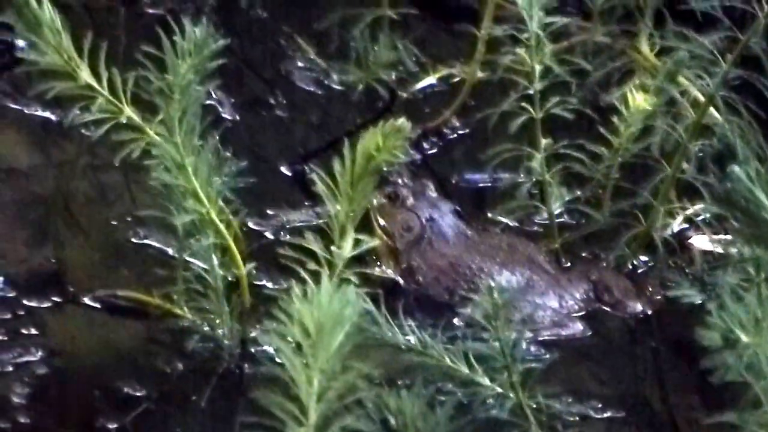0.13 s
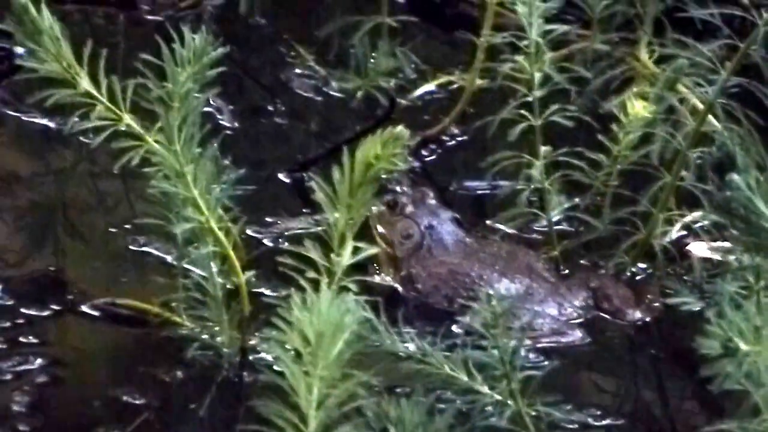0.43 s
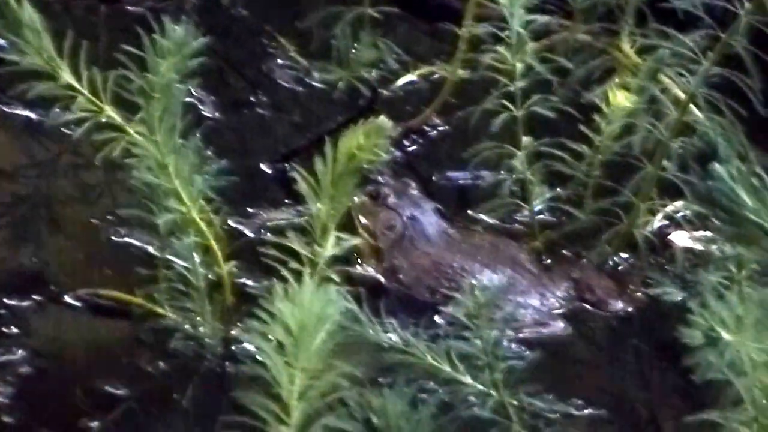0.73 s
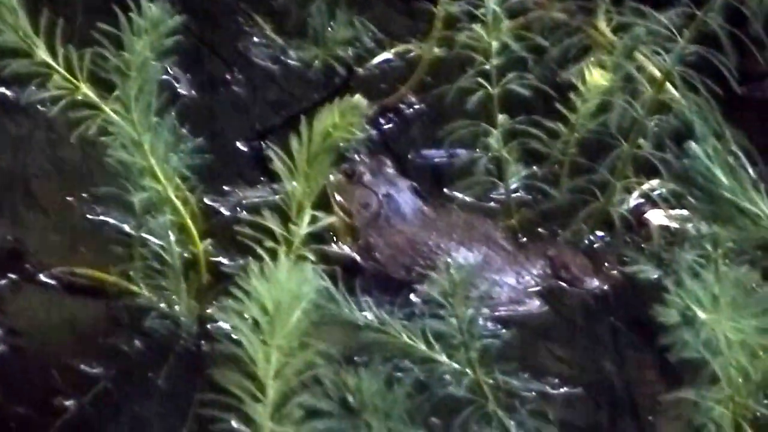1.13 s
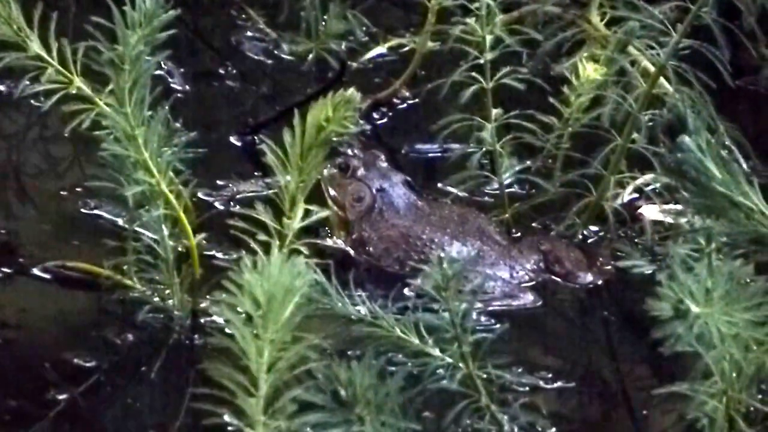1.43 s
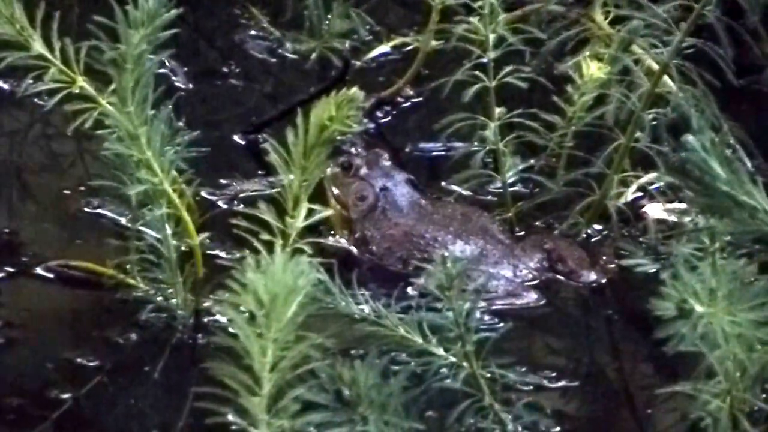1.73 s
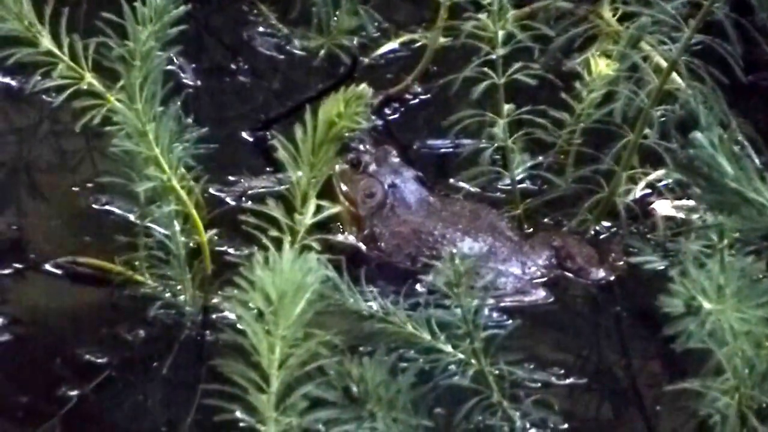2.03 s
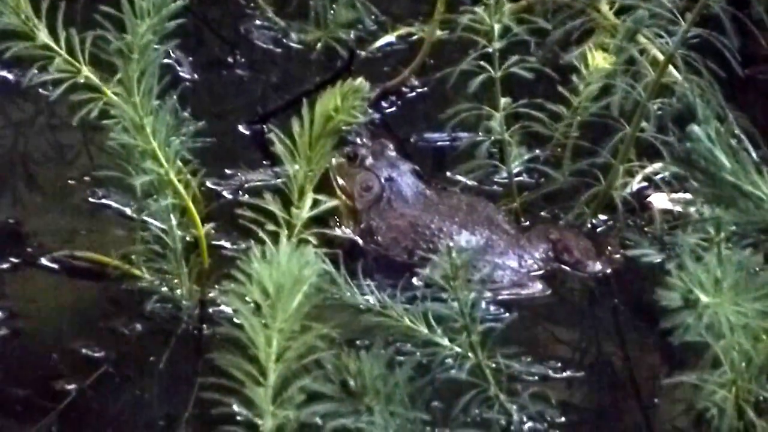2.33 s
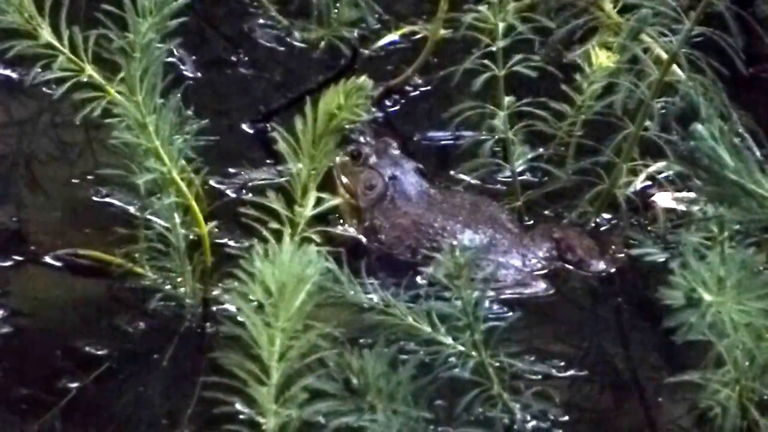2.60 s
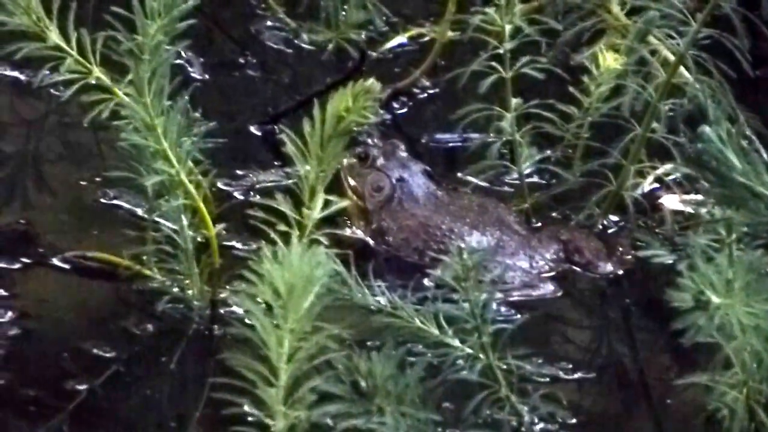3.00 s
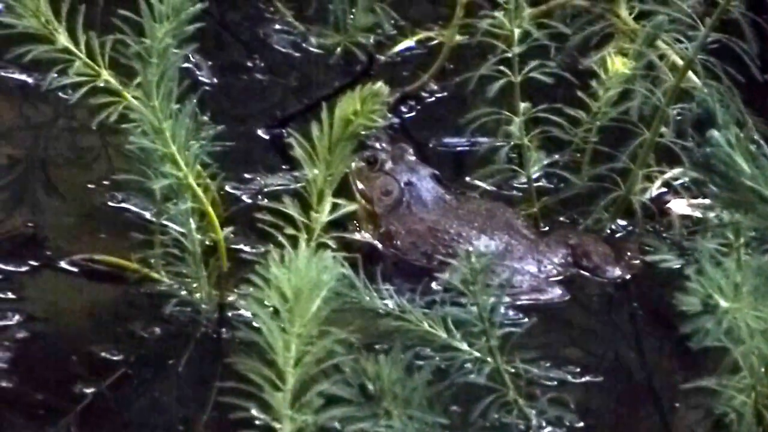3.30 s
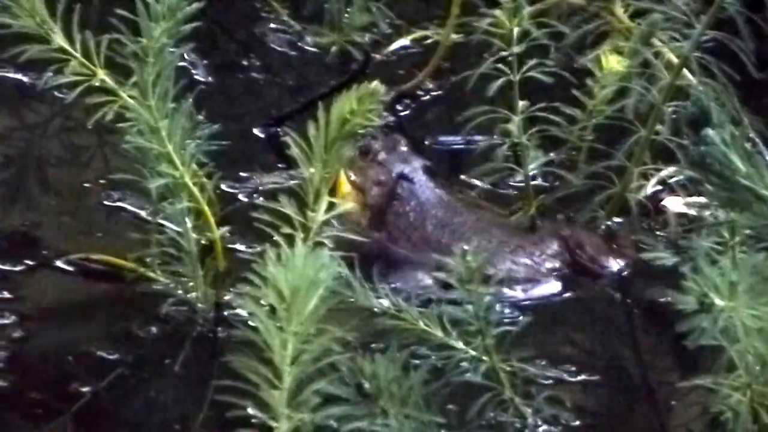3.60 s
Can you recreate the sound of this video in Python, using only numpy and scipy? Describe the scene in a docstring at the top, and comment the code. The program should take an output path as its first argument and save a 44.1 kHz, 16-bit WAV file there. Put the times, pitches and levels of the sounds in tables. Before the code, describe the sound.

Two short, deep bullfrog bellows amid dense katydid buzz and small frogs' high peeps and trills.

```python
"""A pond at night. Throughout, filtered noise gives the night air, a murmur of far bullfrogs and a dense
katydid chorus; a cricket pulses in short tones, and a crowd of small frogs peeps in bell-shaped notes.
From the start, near small frogs add single chirps and pulsed, gliding trills. Two near bullfrogs, harmonic
pulses and rasp through throat resonances, bellow once each: one early, one in the last moments."""
import sys
import numpy as np
from scipy import signal
from scipy.fft import rfft, irfft
from scipy.io import wavfile
from scipy.ndimage import uniform_filter1d, map_coordinates

SR = 44100
rng = np.random.default_rng(int(sys.argv[2]) if len(sys.argv) > 2 else 0)


def wav_out(sig):
    """Save sig, one row per channel (or a flat mono array), as 16-bit PCM at SR to the path in sys.argv[1]."""
    wavfile.write(sys.argv[1], SR, np.round(np.clip(np.atleast_2d(sig).T, -1, 1) * 32767).astype(np.int16))


def gain_from_db(level_db):
    """Turn a decibel level (scalar or array-like) into a linear amplitude factor."""
    decades = np.asarray(level_db, float) / 20
    return 10 ** decades


N = 165375  # samples
T = np.arange(N) / SR  # time in s


def unit(x):
    """Normalization: x scaled to a root-mean-square value of 1."""
    return x / np.sqrt(np.mean(x ** 2) + 1e-20)


def along(points, hz):
    """Interpolation of (Hz, value) points on a logarithmic frequency axis."""
    f, v = np.transpose(points)
    return np.interp(np.log(hz + 1), np.log(f + 1), v)


def wobble(rate):
    """Slow random modulation: a smooth curve through random knots, rate of them a second."""
    knots = rng.standard_normal(int(N * rate / SR) + 4)
    return map_coordinates(knots, [T * rate])


def place(x, pan_db, lag_s):
    """Stereo localization by level (left over right) and time (left after right) differences."""
    hz = np.fft.rfftfreq(N, 1 / SR)
    side = np.array([[.5], [-.5]])
    delay = np.exp(-2j * np.pi * hz * side * lag_s)
    return irfft(rfft(x) * gain_from_db(side * pan_db) * delay, N)


def through(x, points):
    """Minimum-phase filtering: a causal filter with the gain of (Hz, dB) points."""
    gain = gain_from_db(along(points, np.fft.rfftfreq(8192, 1 / SR)))
    cepstrum = irfft(np.log(gain))
    # folding the cepstrum onto positive times makes the response causal
    cepstrum[1:4096] *= 2
    cepstrum[4097:] = 0
    response = irfft(np.exp(rfft(cepstrum)))
    return signal.fftconvolve(x, response)[:N]


def bank(x, t60, wet_db):
    """Diffuse reflection: x plus a short echo of reeds and bank, which scatter only the shorter waves."""
    t = np.arange(SR // 4) / SR
    tail = rng.standard_normal(len(t)) * gain_from_db(-60 * t / t60) * (t > .003)
    highpass = signal.butter(2, 600, "high", fs=SR, output="sos")
    tail = signal.sosfilt(highpass, tail)
    return x + gain_from_db(wet_db) * signal.fftconvolve(x, tail / np.linalg.norm(tail))[:N]


# Likeness of the two channels of diffuse sound: frequency [Hz], correlation [-1 to 1]
CHANNEL_LIKENESS = [(60, 0.93), (120, 0.96), (240, 1), (480, 0.86), (950, 0.53), (1890, 0.39), (3770, 0.26),
                    (7520, 0.29), (15000, -0.28)]
# Balance of the two channels of diffuse sound: frequency [Hz], left_over_right [dB]
CHANNEL_BALANCE = [(30, -4), (180, -2), (550, -1.5), (2400, 0), (4300, -2), (5500, 1), (9000, 0),
                   (15000, 2.5)]


def rush(spectrum, patchy_db):
    """Diffuse field: partly correlated stereo noise of rms 1, with time-frequency patches of random gain."""
    z = signal.stft(rng.standard_normal((2, N)), nperseg=512)[2]
    field = rng.standard_normal(z.shape[1:])
    field = uniform_filter1d(field, size=4, axis=0)
    field = uniform_filter1d(field, size=12, axis=1)
    noise = signal.istft(z * gain_from_db(patchy_db * unit(field)), nperseg=512)[1][:, :N]
    hz = np.fft.rfftfreq(N, 1 / SR)
    # the shares of mid and side set the correlation of left and right
    angle = np.arccos(np.clip(along(CHANNEL_LIKENESS, hz), -1, 1)) / 2
    mid, side = rfft(noise) * [np.cos(angle), np.sin(angle)]
    balance = gain_from_db(along(CHANNEL_BALANCE, hz) / 2)
    left, right = (mid + side) * balance, (mid - side) / balance
    return unit(irfft(gain_from_db(along(spectrum, hz)) * [left, right], N))


# Night air, the farthest small frogs and a faint far cricket, as a spectral shape:
# frequency [Hz], relative_density [dB per Hz]
AIR_SPECTRUM = [(18, -50), (30, -41), (49, -21.5), (102, -24.5), (200, -21.5), (443, -36.5), (690, -35),
                (1680, -39.5), (1950, -28), (2120, -18), (2330, -28), (2550, -41), (2980, -30.5),
                (3080, -35.5), (3180, -35.5), (3580, -40), (3900, -17.5), (4250, -13), (4650, -19.5),
                (5200, -36), (6000, -60)]


def night_air():
    """Spectral shaping: steady diffuse noise whose bands stand for air and the farthest callers."""
    return gain_from_db(-36) * rush(AIR_SPECTRUM, patchy_db=1.1)


# Far bullfrogs merged, as a spectral shape: frequency [Hz], relative_density [dB per Hz]
MURMUR_SPECTRUM = [(90, -32), (140, -3.5), (195, 3), (224, 1.5), (269, -19), (307, -2), (350, -1),
                   (410, -15), (480, -25.5)]
# Mean course of their murmur, before its random swells: time [s], level [dB]
MURMUR_COURSE = [(0, -48.5), (1.3, -45.5), (2.5, -48), (3, -42.5), (3.4, -42)]


def far_bullfrogs():
    """Incoherent summation: far voices merge into low noise that swells now and then."""
    level_db = np.interp(T, *np.transpose(MURMUR_COURSE)) + 3.7 * wobble(2.35)
    return gain_from_db(level_db) * rush(MURMUR_SPECTRUM, patchy_db=1.0)


# Katydid chorus as a spectral shape: frequency [Hz], relative_density [dB per Hz]
KATYDID_SPECTRUM = [(2880, -60.5), (4900, -22.5), (5320, -19.5), (5390, -20), (5800, -10), (8280, 2.5),
                    (8770, 0.5), (11000, -21), (12200, -21), (15500, -25.5)]
# Course of the chorus, before a common 2 dB lift: time [s], level [dB]
KATYDID_COURSE = [(0, -18), (.15, -17.5), (.9, -18.5), (3.5, -17.5)]


def katydids():
    """Incoherent summation: strokes too dense to part become patchy bright noise that swells slowly."""
    level_db = np.interp(T, *np.transpose(KATYDID_COURSE)) + 2.0 + 0.064 * wobble(14)
    return gain_from_db(level_db) * rush(KATYDID_SPECTRUM, patchy_db=0.32)


# Partials of the cricket's wing, before a common 5.5 dB lift and random variation:
# frequency [Hz], level [dB]
WING_PARTIALS = [(5600, -43), (6010, -40), (12200, -51), (12550, -50)]


def cricket():
    """Stridulation: nearly even wing strokes of uneven size, each a short note that falls in pitch."""
    strokes_per_s, first_stroke_s = 14.95, 0.051
    half_s, fall = .011, 0.0017  # stroke half-width; share of pitch lost in that time
    beat = ((T - first_stroke_s) * strokes_per_s + .5 + 0.042 * wobble(6.96)) % 1 - .5
    t = beat / strokes_per_s  # time from the middle of the stroke
    bent_time = np.cumsum(1 - fall * t / half_s + .002 * wobble(0.59)) / SR
    shape = unit(np.exp(-.5 * (t / half_s) ** 2))
    wing = 0
    for hz, db in WING_PARTIALS:
        wing = wing + gain_from_db(db + 5.5 + 2.2 * wobble(12)) * np.sin(2 * np.pi * hz * bent_time)
    return place(shape * wing, pan_db=5, lag_s=4e-5)


def peeps(s, hz, gain, half_s, low_db):
    """Gaussian tone bursts: short bell-shaped notes, each with a partial an octave below."""
    t = np.arange(-1400, 1400) / SR
    phase = 2 * np.pi * (np.asarray(hz)[:, None] * t + rng.random((len(s), 1)))
    tone = np.sin(phase) + gain_from_db(low_db) * np.sin(phase / 2)
    notes = np.asarray(gain)[:, None] * np.exp(-.5 * (t / half_s) ** 2) * tone
    at = np.round((np.asarray(s)[:, None] + t) * SR).astype(int)
    inside = (at >= 0) & (at < N)
    return np.bincount(at[inside], notes[inside], N)


def crowd(count=600):
    """Random superposition: farther small frogs in three directions, random in time, pitch and size."""
    pitch_hz, spread = 4249, 0.065  # spread: largest random departure, as a share of pitch
    rise = 0.032  # share by which the pitch climbs over the scene, as higher voices join
    out = 0
    for pan_db, lag_s in [(-1.0, 0.00073), (-4.5, -3e-5), (-1, -2.4e-4)]:
        when, up, down, size = rng.random((count, 4)).T
        hz = pitch_hz * (1 + spread * (up - down) + rise * (when - .5))
        notes = peeps(when * N / SR, hz, size, half_s=0.0059, low_db=-8)
        out = out + place(notes, pan_db, lag_s)
    return gain_from_db(-37) * unit(out)


# Chirps of a near small frog, levels before a common 0.5 dB lift: start_s [s, middle of the note],
# pitch_hz [Hz, upper partial], level_db [dB]
CHIRP_NOTES = [(0.029, 4034, -20.5), (.21, 4130, -26.5), (.41, 4150, -27.5), (.445, 4190, -29),
               (.622, 4135, -25.5), (.668, 4180, -26.5), (.87, 4310, -27.5), (2.825, 4230, -26.5)]


def chirps():
    """Gaussian tone bursts: the loudest single notes of a near small frog."""
    s, hz, db = np.transpose(CHIRP_NOTES)
    notes = peeps(s, hz, gain_from_db(db + 0.5), half_s=0.009, low_db=-14.5)
    return place(notes, pan_db=-4.5, lag_s=-0.000041)


# Near small frog trills: start_s [s, first pulse], pitch_hz [Hz, upper partial before rise and sag],
# level_db [dB, before fade and variation], lower_octave_db [dB re upper partial], left_over_right_db [dB]
TRILL_CALLS = [(-.553, 4210, -46.5, 4, 1), (.83, 4348, -33.5, -19, -7), (1.074, 4195, -49, 4, 1),
               (2.43, 4660, -36.5, -15, -3), (2.81, 4462, -29, -13, -2.5), (2.9, 4380, -36, -14, -2.5)]


def trills():
    """Amplitude and frequency modulation: each slides up, then sags and fades as its pulses deepen."""
    length_s, pulses_per_s = 1.91, 10.4
    rise_hz, rise_s, sag_hz, sag_s = 190, .08, 90, 1.1
    depth, deepen_s, fade_db_per_s = .7, .45, 4.5
    out = np.zeros((2, N))
    for s, hz, db, low_db, pan_db in TRILL_CALLS:
        t = np.maximum(T - s + 0.0566, 0)  # the sound begins just before its first pulse
        slide = rise_hz * np.exp(-t / rise_s)
        sag = sag_hz * (1 - np.exp(-t / sag_s))
        phase = 2 * np.pi * np.cumsum(hz - slide - sag + 22 * wobble(50)) / SR
        beat = np.cos(2 * np.pi * pulses_per_s * (T - s) + 0.17 * wobble(2.55))
        pulse = 1 + depth * (1 - np.exp(-t / deepen_s)) * beat
        edges = np.clip(t / .24, 0, 1) * np.clip((length_s - t) / .2, 0, 1)
        level = gain_from_db(db - fade_db_per_s * t + 2.6 * wobble(22))
        tone = np.sin(phase) + gain_from_db(low_db) * np.sin(phase / 2)
        out += place(edges * level * pulse * tone, pan_db, lag_s=-0.000021)
    return out


def bullfrog(rows, voice, jitter, rasp_db):
    """Source and filter: uneven pulses, and a rasp swelling once a cycle, excite fixed throat resonances."""
    throat_order, pulse_spread = 8, .05  # harmonic where brightness begins; phase in rad per order squared
    s, *columns = np.transpose(rows)
    hz, db, bright = (np.interp(T, s, c) for c in columns)
    gate = np.clip((T - s[0]) / .03, 0, 1) * np.clip((s[-1] + .03 - T) / .03, 0, 1)
    phase = 2 * np.pi * np.cumsum(hz) / SR + jitter * wobble(70)
    pulses = 0
    for k in range(1, 36):
        octaves = np.log2(max(k / throat_order, 1))
        pulses = pulses + gain_from_db(bright * octaves ** 2) * np.cos(k * phase - pulse_spread * k * k)
    highpass = signal.butter(2, 600, "high", fs=SR, output="sos")
    breath = signal.sosfilt(highpass, rng.standard_normal(N))
    rasp = breath * (1 + np.cos(phase)) * gain_from_db(rasp_db + bright)
    return through(gate * gain_from_db(db + 0.44 * wobble(60)) * (pulses + rasp), voice)


# Course of each bellow: start_s [s], pitch_hz [Hz], level_db [dB, before throat and variation],
# brightness_db [dB one octave above the throat order, four times that at two; also added to the rasp]
FIRST_BELLOW = [(.67, 89.7, -51, -16), (.742, 89.6, -41, -8), (.78, 91, -33, 4.5),
                (.834, 86.73, -28.5, 5.5), (.87, 84.85, -30, 6.5), (.966, 85.9, -31, 4.5),
                (1.062, 88.5, -36, -2.5), (1.12, 90.8, -42, -16), (1.16, 89.6, -47.5, -27),
                (1.22, 91.1, -63, -28)]
SECOND_BELLOW = [(3.462, 95.4, -26, 4), (3.486, 97.4, -29.5, 1), (3.53, 101.9, -23.5, 4.5),
                 (3.556, 104.9, -22, 4), (3.6, 103, -21, 5), (3.642, 101.5, -25, 3.5),
                 (3.68, 98.9, -24.5, 2.5), (3.75, 97.7, -27, -6)]
# Resonances of each frog's throat and sac: frequency [Hz], gain [dB]
FIRST_THROAT = [(60, -45), (170, -8.5), (260, 0.5), (345, -0.5), (430, -22.5), (515, -33), (610, -15),
                (780, -18), (855, -13), (905, -2.5), (945, -3), (1020, -9.5), (1110, -21.5), (1290, -15.5),
                (1700, -26), (1900, -33), (2100, -38), (2800, -51.5), (4000, -61)]
SECOND_THROAT = [(70, -53), (203, 0.5), (305, -7.5), (405, -15), (510, -36), (720, -18), (900, -21.5),
                 (1020, -16), (1120, -26.5), (1250, -22), (1700, -24), (1900, -38.5), (2200, -38),
                 (2900, -51.5), (4000, -54)]


def near_bullfrogs():
    """Direct and reflected sound: two frogs bellow once each, every call with its own short echo."""
    first = bullfrog(FIRST_BELLOW, FIRST_THROAT, jitter=.035, rasp_db=5.5)
    first = bank(first, t60=.12, wet_db=-8)
    second = bullfrog(SECOND_BELLOW, SECOND_THROAT, jitter=.015, rasp_db=2)
    second = bank(second, t60=.04, wet_db=-6)
    return place(first, pan_db=-3.0, lag_s=-0.000093) + place(second, pan_db=-2.5, lag_s=-0.000063)


def scene():
    """Linear superposition: the pressures of all sources add."""
    background = night_air() + far_bullfrogs() + katydids()
    small_callers = cricket() + crowd() + chirps() + trills()
    return background + small_callers + near_bullfrogs()


def low_pass(x):
    """Removes everything above the highest recorded frequency."""
    return signal.sosfilt(signal.butter(12, 15620, fs=SR, output="sos"), x)


def record(dry):
    """Stereo pickup: the two channels of the mix as the recorder keeps them."""
    return low_pass(dry)


dry = scene()
out = record(dry)
wav_out(out)
```